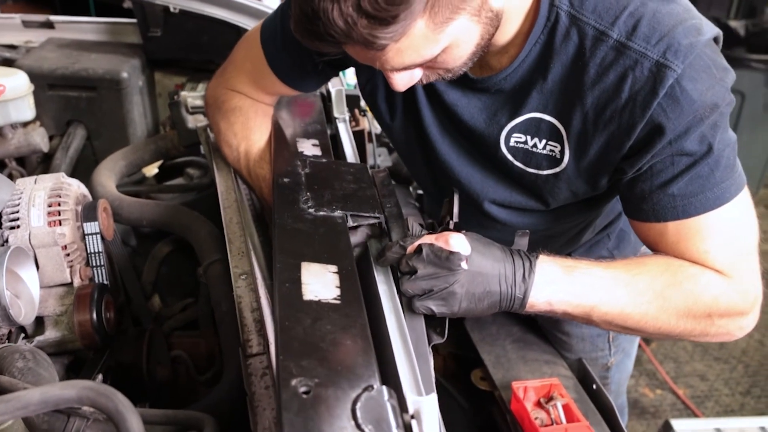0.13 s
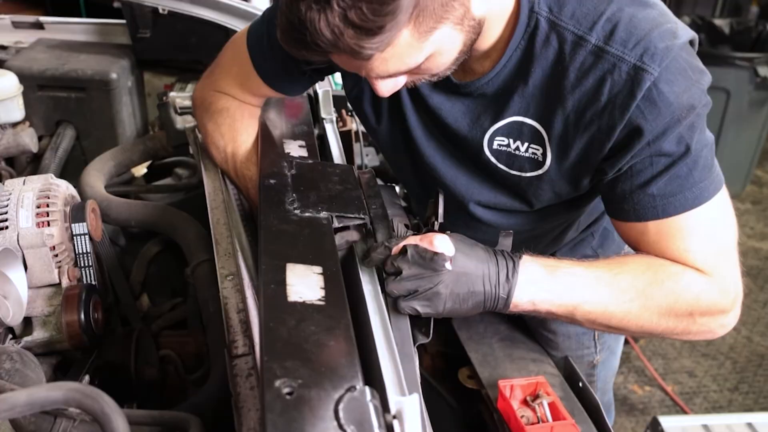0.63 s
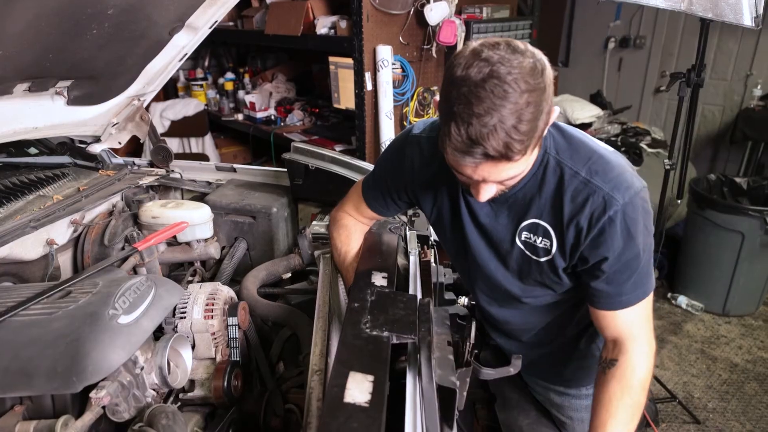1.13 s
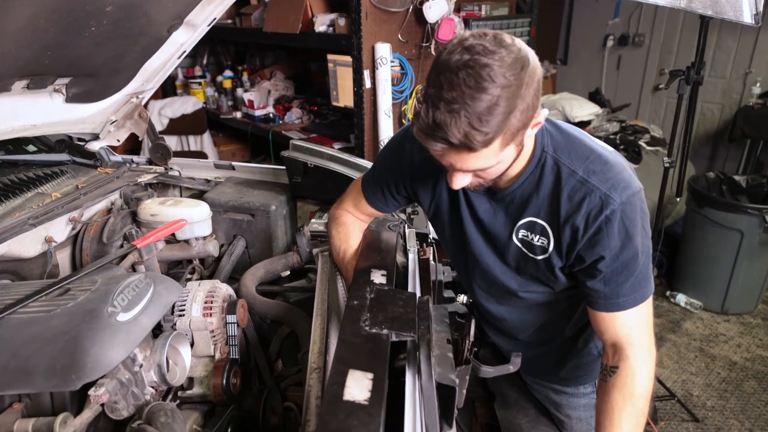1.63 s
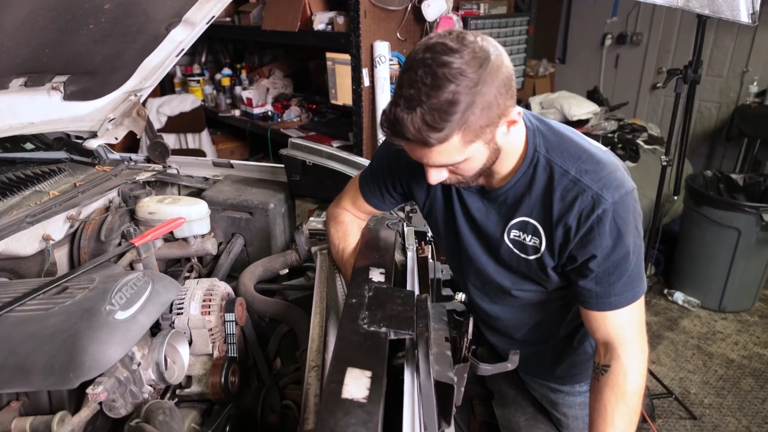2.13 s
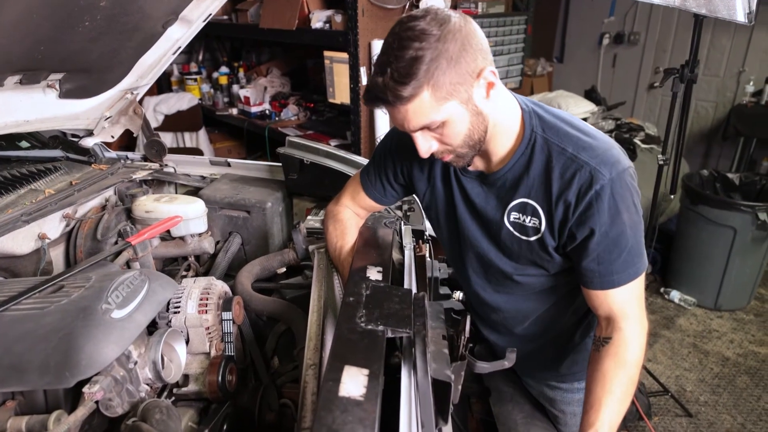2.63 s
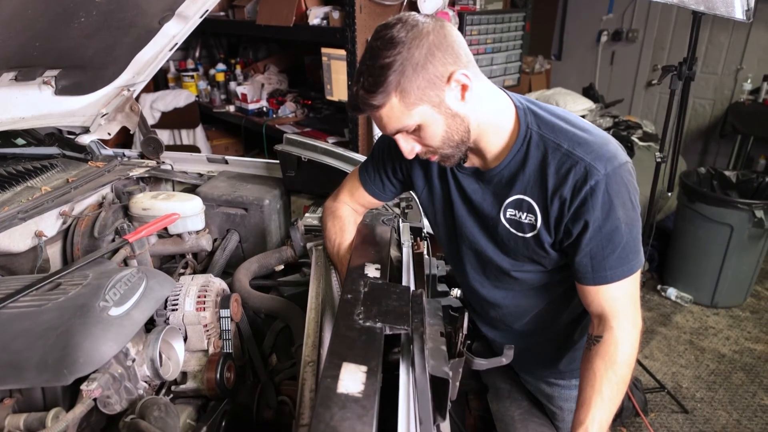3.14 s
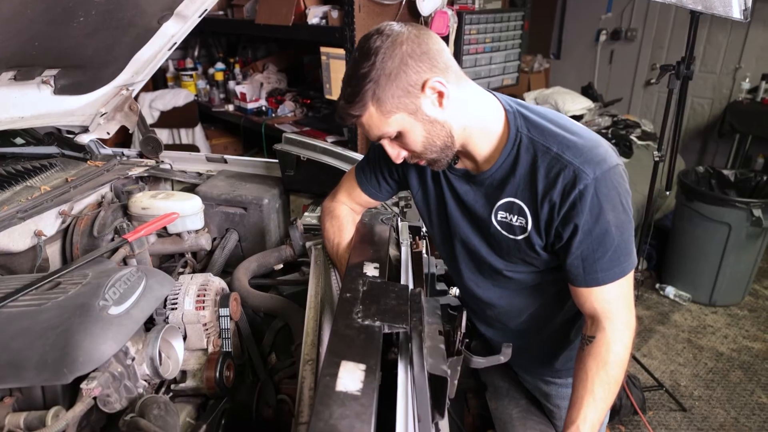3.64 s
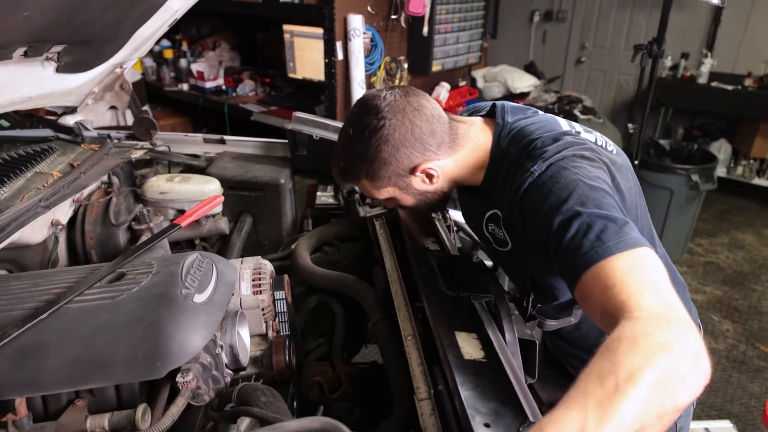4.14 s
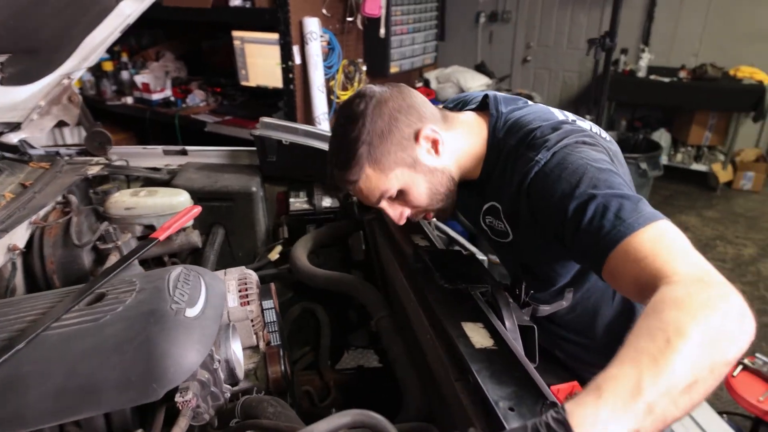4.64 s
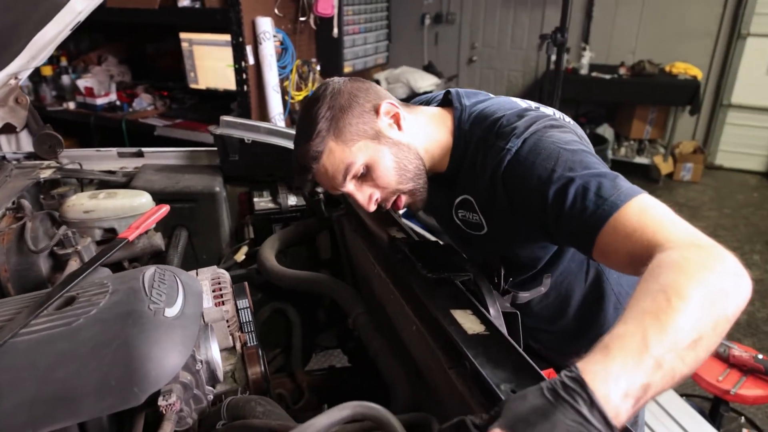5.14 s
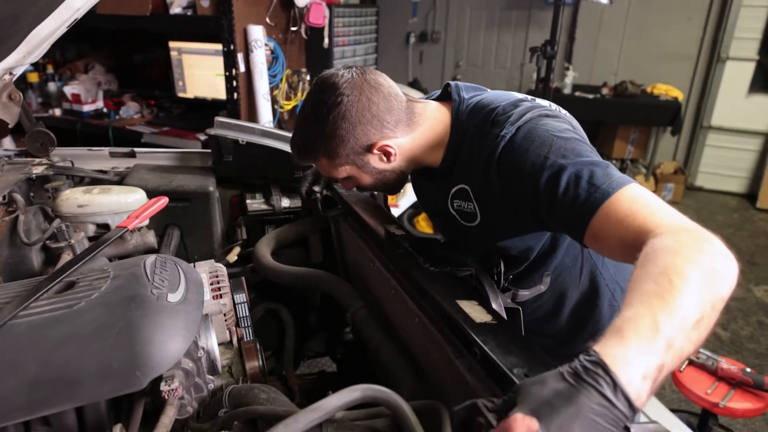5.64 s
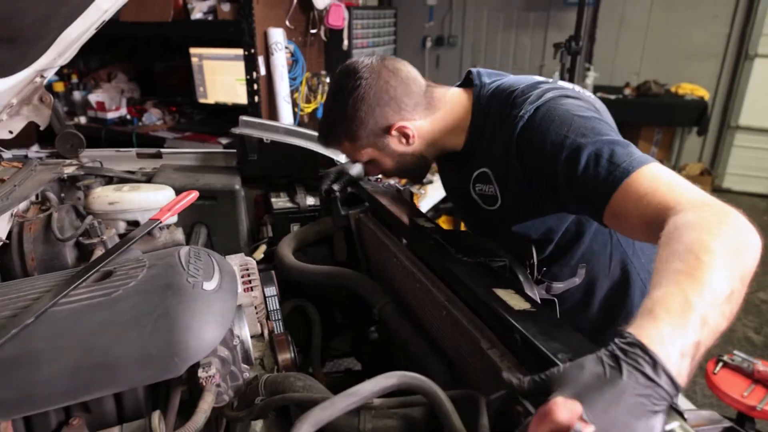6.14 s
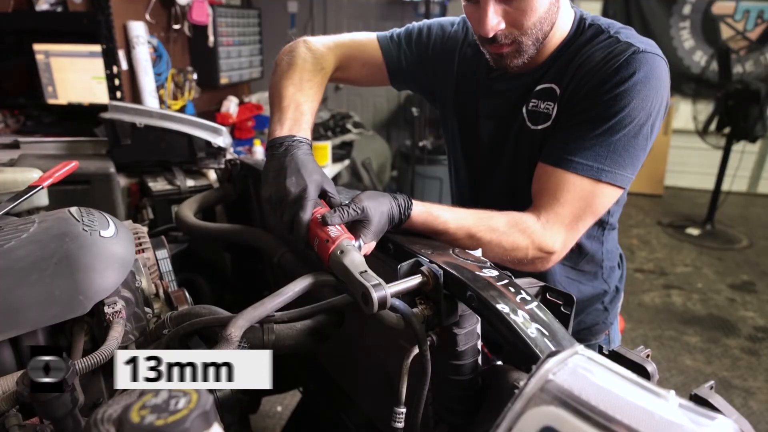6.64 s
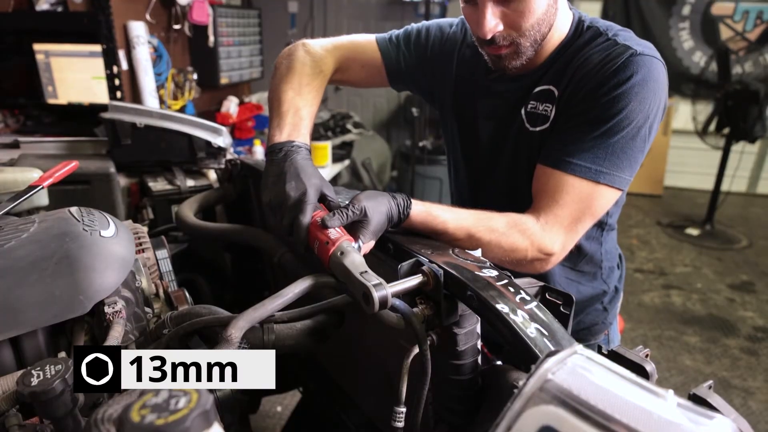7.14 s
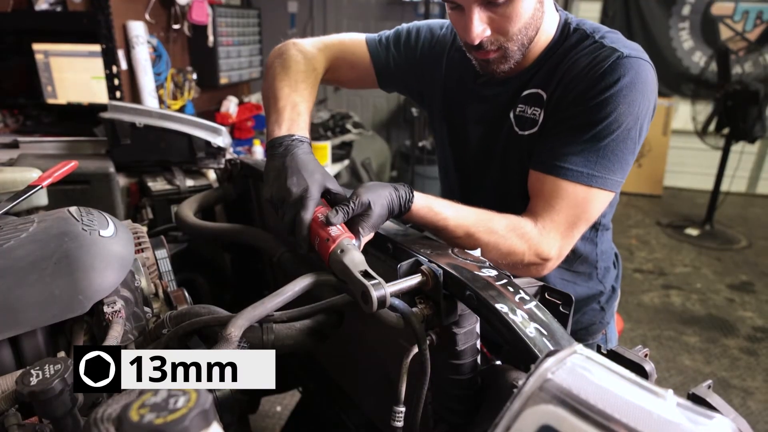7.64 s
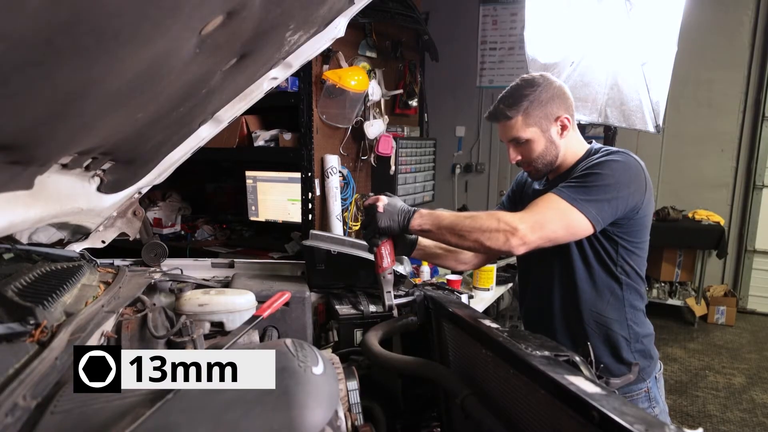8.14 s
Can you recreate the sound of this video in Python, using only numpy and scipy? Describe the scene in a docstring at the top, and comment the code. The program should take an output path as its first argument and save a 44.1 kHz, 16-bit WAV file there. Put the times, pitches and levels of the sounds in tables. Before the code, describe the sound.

Small bolts and brackets knock on sheet steel, a hand ratchet clicks back between hard clanks, then a cordless ratchet whirs, hammers tight and restarts.

```python
"""Mechanic in an engine bay

Bolts and brackets knock and scrape on sheet steel (modes plus noise); thumps ring the car body's panels.
A hand ratchet clicks back over its teeth: each tooth excites the modes of the steel head.
A cordless ratchet runs free, hammers a bolt tight, stops and starts again: gated gear noise, motor tones.
Hollow taps, cloth rubbing, a garage echo, air noise, rumble and faint hiss surround the work.
"""
import sys
import numpy as np
from scipy import signal
from scipy.fft import rfft, irfft, next_fast_len
from scipy.io import wavfile

SR = 44100
rng = np.random.default_rng(int(sys.argv[2]) if len(sys.argv) > 2 else 0)


def invert_db(level):
    """Linear amplitude ratio for a level in decibels (20 dB per decade), elementwise."""
    return 10 ** (np.asarray(level, dtype=float) / 20)


def wav_out(sig):
    """Save sig, one row per channel (or a flat mono array), as 16-bit PCM at SR to the path in sys.argv[1]."""
    wavfile.write(sys.argv[1], SR, np.round(np.clip(np.atleast_2d(sig).T, -1, 1) * 32767).astype(np.int16))


N = 364707
T = np.arange(N) / SR

# Knocks of bolt, socket and bracket, a few drawn out into scrapes:
# start_s, level_db, clink_db, strongest_body_hz, noise_and_ring_t60_s
KNOCKS = [(.019, -33, -20, 1790, 0.032), (.04, -27, 4, 2050, 0.01), (.082, -21.5, -6, 940, 0.013),
          (0.097, -19, -22, 1250, 0.079), (.141, -22.5, 8, 920, 0.07), (0.236, -38.5, 4, 1290, 0.055),
          (.259, -34, -2, 939, 0.01), (0.334, -32, 19, 1230, 0.97), (.363, -24.5, 29.5, 2460, 0.024),
          (0.504, -28, -2, 1780, 0.083), (0.529, -31.5, 9.5, 2600, 0.062), (.566, -30, 2.5, 1080, 0.06),
          (0.588, -20, -36, 1230, 0.055), (.615, -25.5, -7, 1500, 0.022), (0.702, -27, -19, 1450, 0.045),
          (.732, -32.5, -3, 1930, 0.049), (.808, -24, 6.5, 1840, 0.2), (0.836, -29.5, -34, 1510, 0.11),
          (.936, -18, 4, 1560, 0.041), (0.997, -18, -58, 960, 0.081), (1.092, -33, -36, 910, 0.081),
          (1.107, -28, -7, 940, 0.1), (1.259, -5.5, -9, 1140, 0.06), (1.444, -14.5, -13.5, 1020, 0.12),
          (1.493, -15, 5.5, 1020, 0.13), (1.558, -12, -27, 1140, 0.037), (1.606, -25, -1.5, 663, 0.11),
          (1.806, -40.5, -6, 1500, 0.1), (1.845, -4.5, -7.5, 1160, 0.079), (2.025, -15, -6, 694, 0.11),
          (2.204, -40.5, -24, 1560, 0.12), (2.222, -10.5, -8.5, 1170, 0.094),
          (2.426, -11.5, -0.5, 1190, 0.04), (2.5923, -2.5, -5, 1160, 0.073), (2.731, -12, -15, 1190, 0.18),
          (2.752, -6, -10, 874, 0.15), (3.015, -31, -10, 970, 0.2), (3.054, -35, -5, 900, 0.069),
          (3.279, -6, -21, 1086, 0.051), (3.632, -26, 4.5, 1350, 0.052), (3.657, -31.5, -7, 1220, 0.96),
          (3.692, -26.5, 5, 1600, 0.23), (3.73, -19.5, -34, 2070, 0.076), (3.752, -24.5, -34, 1530, 0.034),
          (4.143, -20, -56, 970, 0.17), (4.157, -9.5, -36, 1040, 0.071), (4.194, -28.5, -11, 1260, 1),
          (4.324, -6.5, -19, 680, 0.044), (4.334, -20.5, 6.5, 760, 0.086), (4.515, -20.5, -16, 1520, 0.11),
          (4.542, -38, 3, 1520, 0.069), (4.579, -34, -32, 1614, 0.23), (4.642, -32, -37, 1220, 0.038),
          (4.704, -35.5, -27, 1960, 0.068), (4.897, -48.5, 8, 2500, 0.049), (5.336, -43, -21, 2180, 0.03),
          (5.364, -38, -11, 2150, 0.045), (5.55, -40, -21, 2200, .05), (5.615, -42, -12, 2360, 0.048),
          (6.725, -11, -20, 850, 0.077)]
# Modes of the steelwork: mode_hz, level_db
STEEL_MODES = [(585, -6), (730, -8), (862, -9.5), (957, 0.5), (1063, -22.5), (1235, -3.5), (1355, 2),
               (1505, -2), (1603, 2), (1820, -4.5), (2060, -9.5), (2420, -9), (2740, 6.5), (3250, -23)]
# Crack of a small bolt: freq_hz, db_per_hz
CLINK_SPECTRUM = [(3000, -12), (5000, -20), (6100, 5.5), (7000, 9.5), (7800, 7.5), (8500, 3), (10000, 1),
                  (13000, -4), (16000, -4)]
# Long rings of a loose bracket: mode_hz, level_db, t60_s
LOOSE_BRACKET = [(678, -32, .3), (965, -33, .8), (1010, -33, 1.0), (1227, -29, .6), (1324, -37, .7),
                 (1507, -38, .7), (1841, -32, 1.1), (1875, -36, .8), (2422, -39, .35), (2756, -46, .4),
                 (3149, -41, .6), (3246, -41, .5), (3740, -42, .4), (4247, -40, .5)]
# Cordless ratchet, two runs: time_s, gear_rattle_db, steelwork_drone_db
RUNS = [
    [(6.214, -22.5, -24), (6.73, -22.5, -26), (6.8, -23.5, -25.5), (7.05, -24.5, -25.5), (7.17, -21, -18.5),
     (7.34, -27, -20.5), (7.51, -30.5, -17.5), (7.535, -46, -21), (7.58, -72, -60.5)],
    [(7.84, -19.5, -17), (7.87, -22, -22.5), (7.95, -22.5, -23), (8.27, -21.5, -24.5)],
]
# Gear rattle, per run: freq_hz, db_per_hz
GEAR_SPECTRA = [
    [(1470, -20.5), (2500, -9.5), (2880, -7), (3350, -12), (4050, -6.5), (5460, -4.5), (6200, -1.5),
     (7200, -1), (7920, -5.5), (11000, -3.5), (15500, -10), (16100, -109)],
    [(1470, -51), (2500, -5.5), (3800, -9.5), (4560, -1), (5820, 4), (7090, -9), (7790, -5), (8980, -6.5),
     (10500, -1), (11600, -9), (14100, -0.5), (15900, -11), (16500, -56)],
]
# Drone in the steelwork, per run: freq_hz, db_per_hz
DRONE_SPECTRA = [
    [(80, -55), (139, -4), (238, -67.5), (275, 0), (317, -31), (354, -3.5), (448, -11.5), (485, -0.5),
     (698, 2), (2400, -2), (6000, -23)],
    [(80, -38), (203, -61), (317, -4.5), (414, 1.5), (448, -1), (550, 7), (596, 0), (1000, 6.5),
     (1070, 7.5), (3500, -7.5), (7700, -29)],
]
# Five gear contacts of a crank turn, one row per run: contact_db
TEETH_DB = [
    [0, -0.67, 2.5, -64, 10],
    [0, 1, -57, -3.5, -32],
]
# Motor tones at free speed, per run: tone_hz, rms_db
WHINE = [
    [(280, -47), (352, -46), (500, -44), (632, -41), (705, -41), (770, -41), (842, -40), (1120, -45),
     (996, -42), (1260, -45), (1518, -45), (2309, -45), (3903, -44), (3992, -37), (4140, -44), (4328, -45)],
    [(420, -44), (560, -38), (770, -42), (980, -38), (1195, -41), (1400, -41), (1545, -43), (3989, -46),
     (4840, -46)],
]
# Gear housing: mode_hz, level_db
HOUSING_MODES = [(6080, -4), (7100, -0.5), (8300, -2), (10700, 2.5), (12200, -10)]
# Blows of the stalling head on the tight bolt, one a turn: start_s, peak_db
BLOWS = [(7.2356, -7), (7.254, -8), (7.270, -14), (7.286, -10), (7.303, -8), (7.3203, -4), (7.3379, -5.5),
         (7.3565, -8), (7.3752, -5), (7.3955, -4.5), (7.4152, -5.5), (7.4375, -5.5), (7.459, -7),
         (7.48, -4.5), (7.5082, -9)]
BLOW_S, BLOW_DB = np.transpose(BLOWS)
# Modes of the bolted bracket: mode_hz, level_db, t60_s
BOLTED_MODES = [(275, -16, .1), (345, -15, .08), (400, -17, .06), (530, -14, .07), (640, -16, .06),
                (920, -10, .045), (1450, -3, .03), (1950, -3, .02), (2400, -6, .016)]
# Growl while the bolt resists: freq_hz, db_per_hz
GROWL_SPECTRUM = [(60, -42), (304, 10), (484, 6), (533, 5), (702, 0), (924, 1), (1320, 5.5), (1470, -29),
                  (1600, 0.5), (2080, -25), (3520, -120)]
# Back strokes of the hand ratchet: first_tooth_s, last_tooth_s, peak_db, handle_over_head_db
STROKES = [(1.123, 1.171, -20.5, -20.5), (1.468, 1.525, -21, -20.5), (1.863, 1.94, -22.5, -17),
           (2.264, 2.349, -23.5, -13.5), (2.615, 2.712, -24.5, -9), (3.695, 3.763, -25.5, -13.5),
           (3.785, 3.786, -28, -26)]
# Teeth passed in each back stroke: count
TEETH_PASSED = [5, 7, 9, 10, 11, 8, 1]
# Modes of the hand ratchet's head: mode_hz, width_hz, level_db
HEAD_MODES = [(2820, 43, -3.5), (3210, 39, -12), (4260, 45, -12), (4550, 40, -9), (5140, 44, -1),
              (5430, 49, 1), (6600, 35, -17), (7320, 76, -13), (8400, 33, 2.5), (9200, 40, -22),
              (8840, 43, -3), (9930, 130, -9.5), (10540, 200, -2.5)]
# Pawl hiss: freq_hz, db_per_hz
HEAD_HISS = [(1500, -58), (3000, -17), (4300, -18), (5200, 14), (6200, 10), (8200, 9.5), (11000, 5.5),
             (14000, 3), (16000, -11.5)]
# Thumps of hand or arm against the car body: start_s, level_db
THUMPS = [(0.834, -38), (0.996, -48), (1.258, -37), (2.428, -29), (2.754, -30), (3.795, -25.5),
          (4.322, -21)]
# Heavy thump: freq_hz, db_per_hz
THUMP_SPECTRUM = [(50, -29), (110, -6.5), (220, 1), (350, 0.5), (700, -4.5), (1000, -15), (2000, -57)]
# Dull push under each knock: freq_hz, db_per_hz
THUD_SPECTRUM = [(35, -28), (60, -41.5), (195, 0.5), (431, -2), (511, 8), (726, 8.5), (900, 6), (1170, -64)]
# Big panels of the car body: mode_hz, level_db, t60_s
PANEL_MODES = [(153.6, -18.5, 0.57), (254, -8, 0.28), (477, -20, .1)]
# Soft taps on something hollow: start_s, level_db
HOLLOW_TAPS = [(4.64, -37), (4.676, -37.5), (4.859, -35.5), (4.939, -45), (5.371, -37.5), (5.571, -36),
               (5.639, -40), (6.035, -35.5)]
# Gloves and cloth rubbing: start_s, length_s, dull_db, bright_db
RUBBING = [(.0, 0.049, -43.5, -59), (0.193, 0.22, -59, -68), (0.428, 0.27, -50.5, -62.5),
           (0.835, 0.08, -68, -54), (0.921, 0.033, -39, -48), (1.239, 0.04, -37.5, -37.5),
           (2.052, 0.12, -55, -67), (2.408, 0.025, -41, -43), (3.253, 0.048, -48.5, -46.5),
           (3.863, 0.24, -59, -77), (4.47, 0.036, -46.5, -59), (4.49, 0.32, -54, -69),
           (4.831, 0.061, -59, -66), (4.97, 0.094, -56, -64.5), (5.313, 0.16, -59.5, -64.5),
           (5.489, 0.22, -53, -75.5), (6.011, 0.067, -67, -65.5)]
# Garage decay: freq_hz, t60_s
GARAGE_T60 = [(100, .9), (500, .75), (2000, .5), (4000, .46), (9000, .45)]
# Air noise of the building: freq_hz, db_per_hz
AIR_SPECTRUM = [(18, -88), (30, -41.5), (75, -13), (107, 0.5), (173, -13), (207, 2), (235, -5), (421, -8),
                (455, -7.5), (1020, -11.5), (1110, -10.5), (12900, -42.5), (13300, -94)]
# Low rumble, swelling with the handling near 4.5 s and the hammering near 7.5 s: time_s, level_db
RUMBLE = [(0.0, -52.5), (0.78, -52.5), (0.94, -82), (4.21, -68.5), (4.49, -42.5), (4.98, -66.5),
          (7.21, -55), (7.49, -32), (7.81, -50.5), (8.27, -46)]


def white():
    """White noise, rms 1 on average."""
    return rng.standard_normal(N)


def rms_one(x):
    """Scale to rms 1."""
    return x / np.sqrt(np.mean(x ** 2) + 1e-20)


def in_time(rows, off_db=-120):
    """Columns of a curve table at every sample, off_db outside it."""
    s, *columns = np.transpose(rows)
    return [np.interp(T, s, c, off_db, off_db) for c in columns]


def at_hz(points, hz):
    """Read a spectrum on a log-frequency axis."""
    point_hz, value = np.transpose(points)
    return np.interp(np.log(hz + 1), np.log(point_hz), value)


def colour(x, spectrum):
    """Filter x by a spectrum; rms 1."""
    gain = invert_db(at_hz(spectrum, np.fft.rfftfreq(N, 1 / SR)))
    return rms_one(irfft(rfft(x) * gain, N))


def hiss(low_hz, high_hz):
    """Band of noise, rms 1."""
    sos = signal.butter(2, [low_hz, high_hz], "band", fs=SR, output="sos")
    return rms_one(signal.sosfilt(sos, white()))


def bass_cut(x, hz):
    """Third-order high-pass; small steel parts radiate little bass."""
    return signal.sosfilt(signal.butter(3, hz, "high", fs=SR, output="sos"), x)


def clicks(s, db):
    """Impulses at the given times."""
    out = np.full(N, 1e-18)
    index = np.clip(np.round(np.asarray(s) * SR).astype(int), 0, N - 1)
    np.add.at(out, index, invert_db(db))
    return out


def fade(x, t60, rise_s=0.0016):
    """Each impulse becomes a quick rise and an exponential fall."""
    r = np.exp(-1 / (rise_s * SR))
    fall = signal.lfilter([1], [1, -invert_db(-60 / (t60 * SR))], x)
    return signal.lfilter([1 - r], [1, -r], fall)


def ring(x, hz, t60):
    """Two-pole resonator: a unit click starts a decaying sine of height 1."""
    r, w = invert_db(-60 / (t60 * SR)), 2 * np.pi * hz / SR
    return signal.lfilter([0, np.sin(w)], [1, -2 * r * np.cos(w), r * r], x)


def knocks():
    """Each knock rings the steel modes near its own pitch, with noisy clatter and a bright crack."""
    max_t60_at_1khz_s = 0.12   # clear tones die quickly; the noisy clatter may last longer
    out = np.zeros(N)
    hz, mode_db = np.transpose(STEEL_MODES)
    chance = rng.standard_normal((len(KNOCKS), len(hz)))
    noise, crack, edge = white(), colour(white(), CLINK_SPECTRUM), hiss(1476, 6380)
    for (s, db, clink_db, centre_hz, t60), luck in zip(KNOCKS, chance):
        i = int(s * SR)
        t = np.arange(min(SR // 2, N - i)) / SR
        now = slice(i, i + len(t))
        near_db = -14.0 * np.abs(np.log2(hz / centre_hz))
        mode_t60 = min(t60, max_t60_at_1khz_s) * (1000 / hz) ** 0.22
        t_col = t[:, None]
        mode_gain = invert_db(mode_db + near_db + 3.9 * luck - 60 * t_col / mode_t60)
        modes = (mode_gain * np.sin(2 * np.pi * hz * t_col)).sum(axis=1)
        band = signal.butter(3, [centre_hz / 1.87, centre_hz * 1.62], "band", fs=SR, output="sos")
        clatter = rms_one(signal.sosfilt(band, noise[now]))
        clatter_gain = invert_db(-13.5 - 60 * t / t60) + invert_db(-21.5 - 60 * t / 0.21)
        body = invert_db(-9.5) * modes + clatter_gain * clatter
        body += invert_db(clink_db * 0.41 - 12.0 - 60 * t / 0.087) * edge[now]
        crack_gain = invert_db(-13.5 - 60 * t / 0.02) + invert_db(-26.0 - 60 * t / 0.079)
        high = crack_gain * invert_db(clink_db) * crack[now]
        out[now] += invert_db(db) * (bass_cut(body, 380) + high)
    return out + loose_bracket()


def loose_bracket():
    """A free-hanging bracket keeps ringing after the knocks from 2.5 to 3.1 s."""
    s, db = np.transpose(KNOCKS)[:2]
    loose = clicks(s, db) * (T > 2.5) * (T < 3.1)
    return sum(invert_db(level_db) * ring(loose, hz, t60) for hz, level_db, t60 in LOOSE_BRACKET)


def cordless_ratchet():
    """Five gear contacts a crank turn gate a rattle and a drone; under load each turn ends in a blow."""
    turns_per_s, free_until_s, restart_s = 70.0, 7.179, 7.8425
    labour_db, labour_below_hz = 6, 600   # lowest motor tones swell under load
    tone_waver = 3   # motor-tone waver depth, times the flutter
    slowing = np.interp(T, [0, free_until_s, *BLOW_S],
                        [-4 - free_until_s * turns_per_s, -4, *range(len(BLOW_S))])
    turns = [slowing, (T - restart_s) * turns_per_s]
    strain = np.clip((T - 7.1) / 0.028, 0, 1) * (T < restart_s)   # motor load, 0-1
    wander = np.cumsum(white()) * .0002   # unsteady speed
    out = hammering()
    for run, turn, teeth_db, gears, drone, tones in zip(RUNS, turns, TEETH_DB, GEAR_SPECTRA,
                                                        DRONE_SPECTRA, WHINE):
        rattle_db, drone_db = in_time(run)
        on = rattle_db > -100
        tooth = np.floor(5 * (turn + wander / 3)).astype(int)
        meets = np.diff(tooth, prepend=tooth[0]) > 0
        contact = meets * invert_db(np.array(teeth_db)[tooth % 5] + 2.5 * np.clip(white(), -2, 2))
        # under load the rattle follows the blows
        gate = (1 - 0.29 * strain) * fade(contact, 0.02) + 2.9 * fade(clicks(BLOW_S, BLOW_DB), 0.031)

        # uneven tooth scrapes
        grit = white() * invert_db(2.74 * np.minimum(rng.exponential(1, N), 4))
        rattle = colour(grit, gears) * (0.48 + 1.386 * gate) * on + pings() * (1 - strain)
        out += invert_db(rattle_db) * flutter() * rattle

        beat = colour(contact * on, drone) * np.sqrt(on.mean())
        hum = .38 * beat + (.62 + .4 * gate) * colour(white(), drone)
        out += invert_db(drone_db) * flutter() * hum

        waver = flutter() ** tone_waver
        whine = np.zeros(N)
        for hz, db in tones:
            level = np.sqrt(2) * invert_db(db + labour_db * strain * (hz < labour_below_hz))
            phase = 2 * np.pi * hz / turns_per_s * turn + wander * hz / turns_per_s
            own_waver = np.roll(waver, int(hz * 97))   # tones waver apart
            whine += own_waver * level * np.sin(phase)
        # motor tones fade out by the fifth blow and return at the restart
        heard = np.clip((BLOW_S[4] - T) / 0.031, 0, 1) + (T > restart_s)
        out += on * heard * whine
    return out


def hammering():
    """Each blow rings the bolted bracket with new mode strengths, a short rattle and a dull shudder."""
    blow_spread_db, growl_db, growl_t60_s = 3, -11, .07
    hits = clicks(BLOW_S, BLOW_DB)
    luck = blow_spread_db * rng.standard_normal((len(BLOW_S), len(BOLTED_MODES)))
    spray = invert_db(-23.0) * hiss(870, 4400) + invert_db(-8.5) * hiss(2900, 7300)
    out = fade(hits, 0.039, rise_s=0.00077) * spray
    growl = bass_cut(colour(white(), GROWL_SPECTRUM), 300)
    out += invert_db(growl_db) * fade(hits, growl_t60_s, rise_s=.002) * growl
    for k, (hz, mode_db, t60) in enumerate(BOLTED_MODES):
        out += (-1) ** k * ring(clicks(BLOW_S, BLOW_DB + mode_db + luck[:, k]), hz, t60)
    return out


def pings():
    """Loose gear teeth slap the housing at random, each slap ringing one mode."""
    slaps_per_s_per_mode, over_rattle_db, t60_s = 30, 8, .007
    struck = rng.random(N) < slaps_per_s_per_mode * len(HOUSING_MODES) / SR
    slaps = struck * invert_db(over_rattle_db + 4 * np.minimum(rng.exponential(1, N), 3))
    dealt = rng.integers(0, len(HOUSING_MODES), N)
    return sum(invert_db(db) * ring(slaps * (dealt == k) + 1e-18, hz, t60_s)
               for k, (hz, db) in enumerate(HOUSING_MODES))


def flutter():
    """Slow random gain as the tool shifts in the hand."""
    depth_rms_db, cutoff_hz = 1.0, 14
    slow = signal.sosfilt(signal.butter(2, cutoff_hz, fs=SR, output="sos"), white())
    return invert_db(depth_rms_db * rms_one(slow))


def hand_ratchet():
    """The pawl snaps down and chatters in grains, exciting each mode of the steel head anew."""
    hand_damping_hz = 110   # the grip widens every mode
    mode_spread_db = 5.0   # each tooth strikes the head a little differently
    s, db, handle_db = pawl()
    grains = rms_one(white() * invert_db(4.0 * np.minimum(rng.exponential(1, N), 4)))
    modes = np.zeros(N)
    for hz, width_hz, level_db in HEAD_MODES:
        damped_hz = width_hz + hand_damping_hz
        tooth_db = db + mode_spread_db * rng.standard_normal(len(s))
        chatter = fade(clicks(s, tooth_db), 0.03, rise_s=.0002) * grains
        modes += invert_db(level_db) * ring(chatter, hz, 2.2 / damped_hz) * np.sqrt(damped_hz / SR)
    rattle = fade(clicks(s, db), 0.04, rise_s=.0002) * colour(grains, HEAD_HISS)
    handle = fade(clicks(s, db + handle_db), 0.077) * hiss(540, 3700)
    return invert_db(-6.5) * modes + invert_db(-5.5) * rattle + handle


def pawl():
    """Tooth times (s), levels (dB) and handle shares (dB); each back stroke slows toward its end."""
    slowing_power, jitter_s, spread_db = 1.12, .0009, 2.5
    luck = rng.standard_normal((len(STROKES), 2, 12))
    first, last, db, handle_db = np.transpose(STROKES)[:, :, None]
    teeth = np.array(TEETH_PASSED)[:, None]
    way = np.arange(12) / np.maximum(teeth - 1, 1)   # 0-1 through the stroke
    jitter = jitter_s * luck[:, 0] * (way > 0) * (way < 1)
    s = first + (last - first) * way ** slowing_power + jitter
    # slower teeth snap harder
    level_db = db + 1.5 * way + spread_db * np.clip(luck[:, 1], -2, 1)
    passed = np.arange(12) < teeth
    return s[passed], level_db[passed], np.broadcast_to(handle_db, s.shape)[passed]


def thumps():
    """A dull push into the car body under every knock; heavy thumps are deeper and ring the big panels."""
    under_knock_db, rise_s, t60_s = -16.5, 0.021, 0.12
    s, db = np.transpose(KNOCKS)[:2]
    light = fade(clicks(s, db + under_knock_db), t60_s, rise_s) * colour(white(), THUD_SPECTRUM)
    heavy = clicks(*np.transpose(THUMPS))
    deep = fade(heavy, 0.26, rise_s=0.003) * colour(white(), THUMP_SPECTRUM)
    panels = sum(invert_db(level_db) * ring(heavy, hz, t60) for hz, level_db, t60 in PANEL_MODES)
    return light + deep + panels


def hollow_taps():
    """Soft contacts on an air-filled resonance, a little off pitch each time, with a little scuff."""
    resonance_hz, t60_s, pitch_spread = 610, 0.095, .04
    s, db = np.transpose(HOLLOW_TAPS)
    push = fade(clicks(s, db), 0.011)
    detune = pitch_spread * np.interp(T, s, rng.uniform(-0.9, 1, len(s)))
    phase = 2 * np.pi * np.cumsum(resonance_hz * (1 + detune)) / SR
    swing = np.sin(phase) + .6 * np.sin(1.07 * phase)   # plus a close second mode
    tone = fade(push * (1 + 1.5 * white()), t60_s) * swing
    return invert_db(-38.5) * tone + invert_db(-2.5) * push * hiss(330, 1500)


def rubbing():
    """Grainy friction noise in short swells."""
    out, grain = np.zeros(N), 1 + 0.5 * np.abs(hiss(14, 120))
    dull, bright = hiss(800, 2240), hiss(3280, 13000)
    for s, length, dull_db, bright_db in RUBBING:
        swell = np.sin(np.pi * np.clip((T - s) / length, 0, 1)) ** 0.66
        out += swell * grain * (invert_db(dull_db) * dull + invert_db(bright_db) * bright)
    return out


def garage(x):
    """Twenty-four feedback delays whose loop loss follows the decay time of each band."""
    size = next_fast_len(N + SR)
    hz = np.fft.rfftfreq(size, 1 / SR)
    t60 = np.maximum(at_hz(GARAGE_T60, hz), .05)
    response = 0
    for k, lag_s in enumerate(rng.uniform(.011, .05, 24)):
        loop = invert_db(-60 * lag_s / t60) * np.exp(-2j * np.pi * hz * lag_s)
        response = response + (-1) ** k * loop / (1 - loop)
    return irfft(rfft(x, size) * response, size)[:N]


def background():
    """Air noise of the building, a low rumble that swells with the work and a faint steady treble hiss."""
    air_db, hiss_db = -53.5, -69.5
    air = invert_db(air_db) * colour(white(), AIR_SPECTRUM)
    rumble = invert_db(in_time(RUMBLE)[0]) * hiss(98, 320)
    low_pass = signal.butter(24, 12900, fs=SR, output="sos")
    return air + rumble + invert_db(hiss_db) * signal.sosfilt(low_pass, hiss(4000, 16000))


def scene():
    """Close work, its echo in the garage and the background, alike in both channels."""
    by_hand = knocks() + thumps() + hand_ratchet() + hollow_taps()
    tool = bass_cut(cordless_ratchet(), 220)
    # deep in the bay, little treble gets out
    send = invert_db(-26.0) * by_hand + invert_db(-22.5) * tool
    echo = garage(signal.lfilter(*signal.butter(1, 3200, fs=SR), send))
    return np.tile(by_hand + tool + echo + rubbing() + background(), (2, 1))


def roll_off(x):
    """The treble ends steeply here."""
    return signal.sosfilt(signal.butter(12, 17080, fs=SR, output="sos"), x)


def record(dry):
    """Bass cut, soft overload, treble cut; the right port lags slightly until the sound turns mono."""
    port_lag_samples, mono_from_s = 0.77, 6.213
    overloaded = 0.78 * np.tanh(bass_cut(dry[0], 75))
    treble_cut = signal.cheby2(12, 60, 16300, fs=SR, output="sos")
    left = signal.sosfilt(treble_cut, bass_cut(overloaded, 72))
    delay = np.exp(-2j * np.pi * np.fft.rfftfreq(N) * port_lag_samples)
    late = irfft(rfft(left) * delay, N)
    right = np.where(T < mono_from_s, late, left)
    return roll_off(np.array([left, right]))


dry = scene()
out = record(dry)
wav_out(out)
```